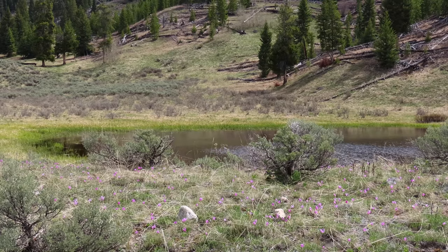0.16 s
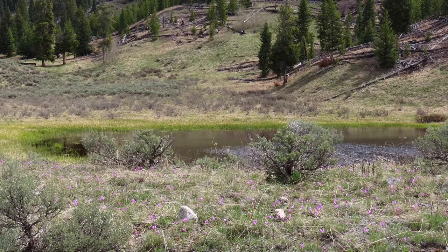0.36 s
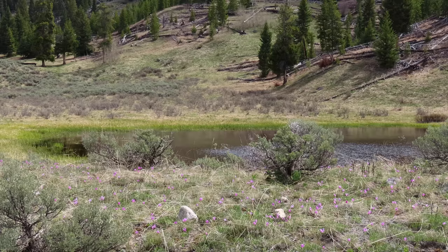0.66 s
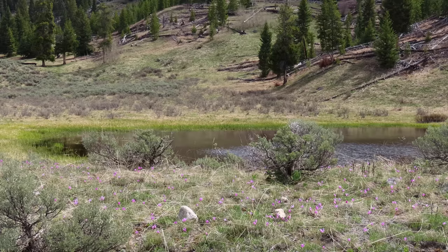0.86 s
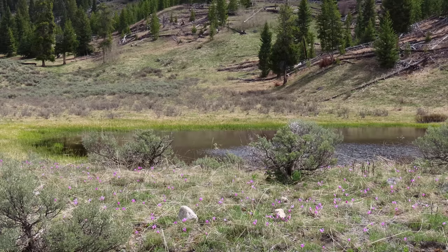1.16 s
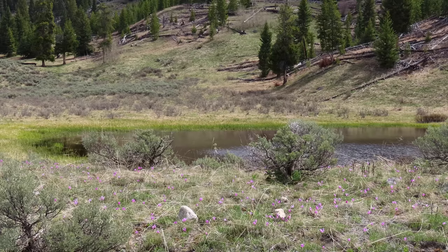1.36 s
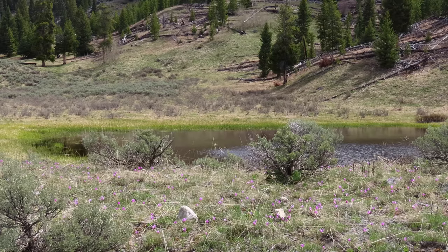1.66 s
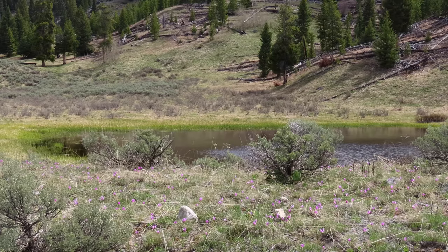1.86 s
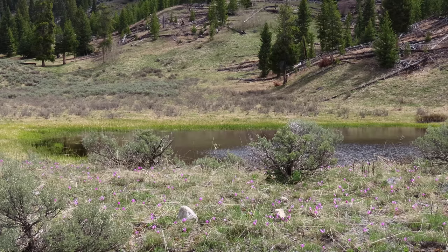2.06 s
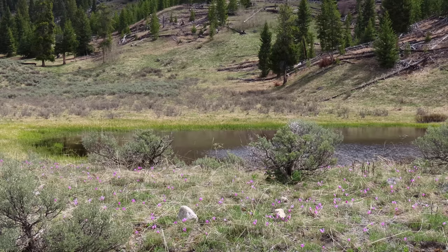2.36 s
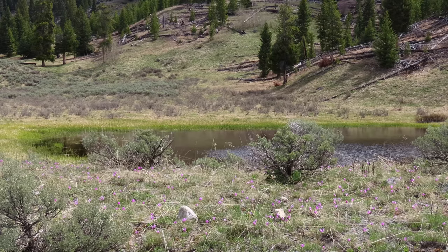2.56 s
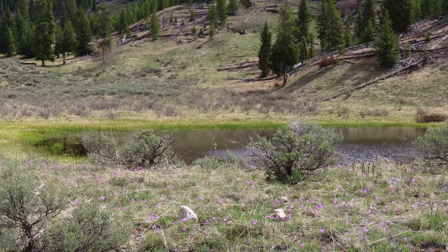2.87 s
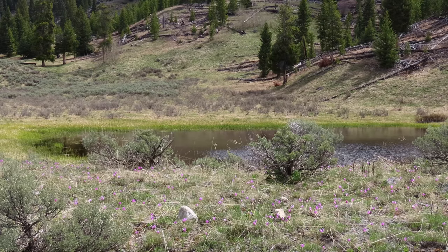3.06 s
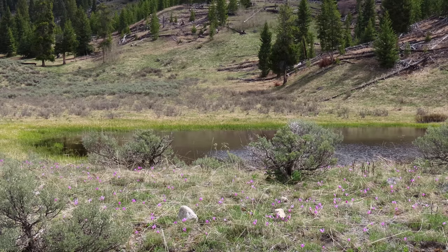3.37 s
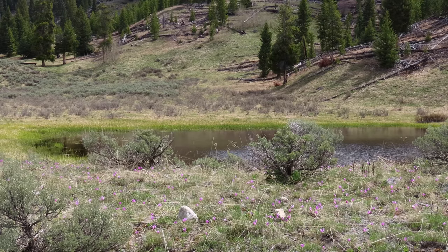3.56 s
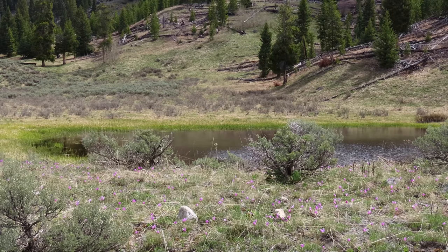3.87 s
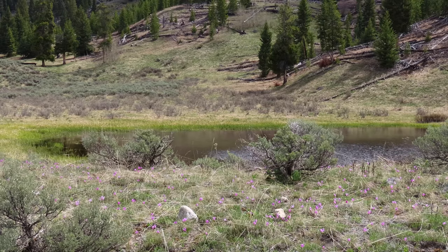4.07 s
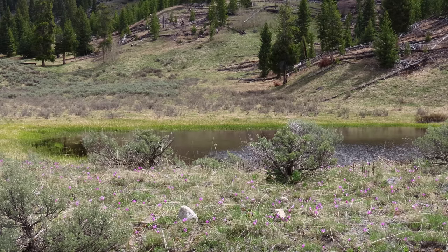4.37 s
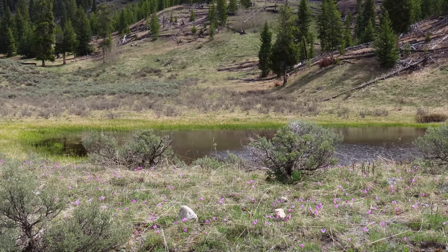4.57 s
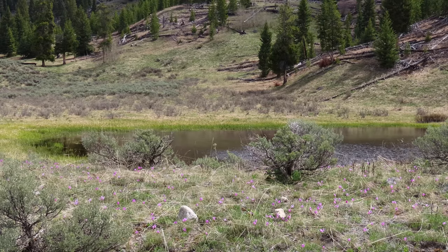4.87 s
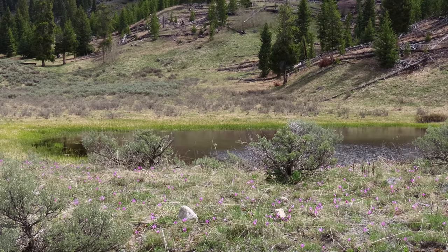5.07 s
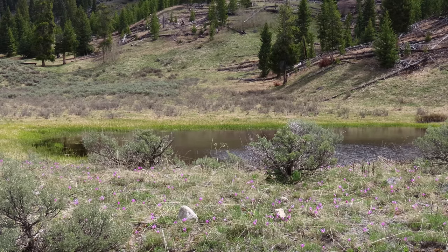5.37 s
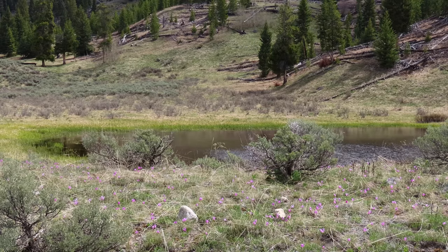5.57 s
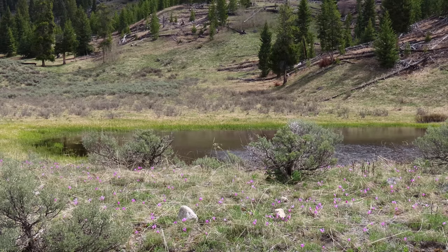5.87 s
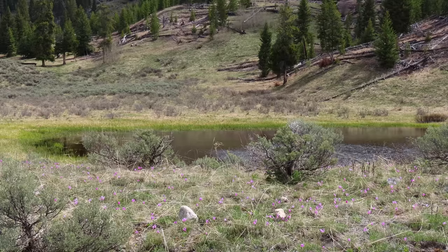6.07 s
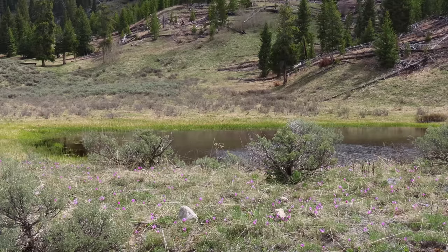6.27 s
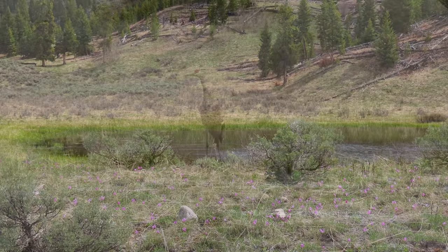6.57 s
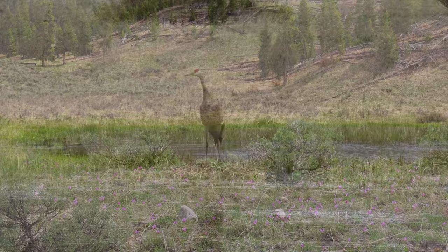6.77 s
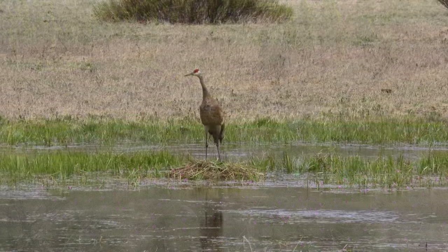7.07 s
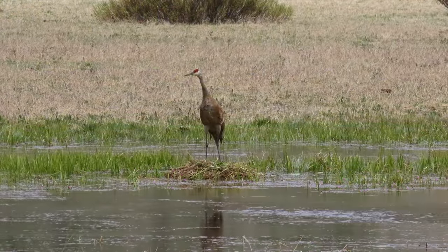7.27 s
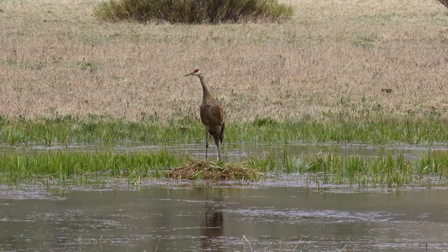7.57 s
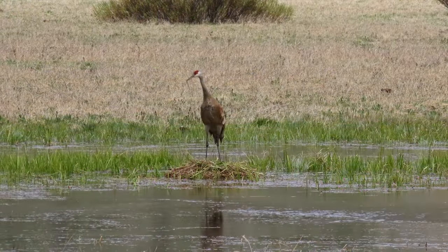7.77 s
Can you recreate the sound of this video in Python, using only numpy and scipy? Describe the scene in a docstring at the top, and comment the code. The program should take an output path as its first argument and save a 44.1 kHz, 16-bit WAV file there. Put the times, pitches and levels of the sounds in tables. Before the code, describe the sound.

Small frogs trill in overlapping rattling trains at a marshy pond, over low wind rumble, until the calls stop abruptly and only wind remains.

```python
"""Frog trills at a meadow pond

Small frogs trill in trains of short notes that mostly slow down and climb in pitch, each note a few sine partials.
Near frogs are heard note by note, far ones as a faint rattle; the frog sound is cut off abruptly at about 7.2 s.
Coloured noise makes wind on the microphone, a rush in the grass and camera hiss, with a thin sine whine.
A few dry ticks are bursts of noise, and two low puffs are short sines."""
import sys
import numpy as np
from scipy import signal
from scipy.fft import rfft, irfft, next_fast_len
from scipy.io import wavfile
from scipy.ndimage import uniform_filter1d, map_coordinates

SR = 44100
rng = np.random.default_rng(int(sys.argv[2]) if len(sys.argv) > 2 else 0)


def file_out(sig):
    """Save sig as 16-bit WAV at sys.argv[1]."""
    # one column per channel
    cols = np.atleast_2d(sig).T
    # limit, then scale
    lim = np.clip(cols, -1, 1)
    pcm = np.round(lim * 32767).astype(np.int16)
    wavfile.write(sys.argv[1], SR, pcm)


N = 349713  # length [samples]


def amp(db):
    """Gain of a level in dB."""
    return 10 ** (np.asarray(db) / 20)


def unit(x):
    """x scaled to rms 1."""
    return x / np.sqrt(np.mean(x ** 2) + 1e-20)


def curves(rows, s):
    """The columns after the time, read at times s."""
    times, *columns = np.transpose(rows)
    return [np.interp(s, times, column) for column in columns]


def wobble(rate):
    """A smooth random curve with rate knots a second."""
    knots = rng.standard_normal(int(N * rate / SR) + 4)
    return map_coordinates(knots, [np.arange(N) * rate / SR])


def colour(points):
    """Gain against frequency, drawn through (frequency [Hz], level [dB]) points on a log axis."""
    f, db = np.transpose(points)
    return lambda hz: amp(np.interp(np.log(hz + 1), np.log(f + 1), db))


def filtered(x, response):
    """x with its spectrum multiplied by a response of frequency."""
    m = next_fast_len(N + 8192)
    gain = response(np.fft.rfftfreq(m, 1 / SR))
    return irfft(rfft(x, m) * gain, m)[:N]


def rush(spectrum, patchy_db):
    """Noise of rms 1 with the given colour and patches of random gain in time and frequency."""
    z = signal.stft(rng.standard_normal(N), nperseg=512)[2]
    field = uniform_filter1d(rng.standard_normal(z.shape), size=6, axis=0)
    field = uniform_filter1d(field, size=12, axis=1)
    noise = signal.istft(z * amp(patchy_db * unit(field)), nperseg=512)[1][:N]
    return unit(filtered(noise, colour(spectrum)))


def placed(s, rows):
    """Sum of short sounds, one row each, starting at times s."""
    at = np.round(s * SR).astype(int)[:, None] + np.arange(rows.shape[1])
    return np.bincount(at.ravel(), rows.ravel(), N + SR)[:N]


def swell(t, peak_s):
    """Quick rise to 1 at peak_s, then a roughly exponential fall."""
    u = t / peak_s
    return (u * np.exp(1 - u)) ** 2


# gusts on the microphone: (time [s], slow push level [dB], faster flutter level [dB]), before the random lumps
GUSTS = [(0.0, -35, -43), (0.06, -32, -44.5), (1.26, -39, -47), (1.59, -33, -38.5), (2.07, -23, -36),
         (2.16, -41, -42.5), (2.67, -22.5, -34.5), (2.72, -20.5, -30.5), (3.13, -34, -42), (3.66, -25, -33),
         (3.95, -31.5, -36), (4.97, -25, -33), (5.14, -31.5, -32.5), (5.26, -23, -35), (5.67, -35.5, -42.5),
         (5.85, -26.5, -29.5), (6.05, -28.5, -39.5), (6.2, -24.5, -32.5), (6.52, -36.5, -49),
         (6.58, -23.5, -39.5), (6.78, -24.5, -33), (7.33, -27.5, -42), (7.4, -21.5, -35),
         (7.64, -36.5, -44), (7.93, -29, -44.5)]
# colours of the pushes and of the flutter: (frequency [Hz], relative level [dB])
PUSH_COLOUR = [(5, -20), (10, 7), (32, 7.5), (110, -7), (170, -47), (300, -120)]
FLUTTER_COLOUR = [(45, -34), (85, -0.5), (199, -7), (420, -27), (900, -120)]


def microphone_wind():
    """Eddies thump the microphone in lumps: a deep rumble and a faster flutter swell together."""
    lumps = wobble(14)
    rumble = unit(amp(2 * lumps) * rush(PUSH_COLOUR, patchy_db=0.3))
    flutter_gain = amp(1.25 * lumps + 0.92 * wobble(25))
    flutter = unit(flutter_gain * rush(FLUTTER_COLOUR, patchy_db=1.5))
    push_db, flutter_db = curves(GUSTS, np.arange(N) / SR)
    return amp(push_db) * rumble + amp(flutter_db) * flutter


# steady air, read by the grass and the hiss below: (time [s], grass level [dB], hiss level [dB]), before trims
AIR_LEVELS = [(0.0, -52.5, -64), (1.94, -52.5, -65), (6.69, -50.5, -63.5), (6.93, -47.5, -61.5),
              (7.93, -50, -64.5)]
# colour of the grass: (frequency [Hz], relative level [dB])
GRASS_COLOUR = [(150, -90), (250, -10.5), (920, -15.5), (1270, -20.5), (1710, -25), (2060, -28.5),
                (3500, -49), (4550, -77), (7700, -120)]


def grass_rush():
    """Wind in grass and trees: many small rustles blur into a rush more even than the gusts."""
    level_db = curves(AIR_LEVELS, np.arange(N) / SR)[0] + 3.5
    return amp(level_db) * rush(GRASS_COLOUR, patchy_db=0.78)


# colour of the camera hiss: (frequency [Hz], relative level [dB])
HISS_COLOUR = [(1470, -39), (2500, 0), (5940, -2), (15800, -5.5)]


def camera_hiss():
    """The camera's own noise: a bright, nearly steady hiss."""
    level_db = curves(AIR_LEVELS, np.arange(N) / SR)[1] + 5.0
    return amp(level_db) * rush(HISS_COLOUR, patchy_db=.3)


# thin whine: (frequency [Hz], level [dB] before a trim)
WHINE_TONES = [(9426, -86)]


def camera_whine():
    """A thin sine whose frequency drifts a little."""
    s = np.arange(N) / SR
    drift = 2 * np.pi * np.cumsum(18 * wobble(30)) / SR  # 18 Hz deviation per unit of wobble
    return sum(amp(db + 11.5) * np.sin(2 * np.pi * hz * s + drift) for hz, db in WHINE_TONES)


# partials of a note: (level [dB], tilt [dB per octave of pitch], time to peak [s] before random stretch)
NOTE_PARTIALS = [(-18, -3.5, 0.0016), (0, -2.5, 0.0026), (-24.5, 16, 0.0015), (-37.5, 17, 0.0028),
                 (-50.5, -11, 0.0029)]
# harmonic number of each partial, in multiples of half the pitch
HARMONICS = (1, 2, 3, 4, 6)
# colour of each note's noisy onset: (frequency [Hz], level [dB])
SNAP_COLOUR = [(800, -48), (1800, 21.5), (5600, 12), (6100, -13), (11000, -40)]


def notes(s, db, hz):
    """A puff through the vocal folds: harmonics of half the pitch; the throat sac favours the second."""
    t = np.arange(1024) / SR
    luck = rng.standard_normal((len(s), 3 + 2 * len(NOTE_PARTIALS)))
    wander = .012 * luck[:, :1]
    drop = 0.018 * np.tanh((hz[:, None] - 2250) / 60)  # the lowest notes tend to slide up instead
    sag = 1 + (drop + wander) * np.tanh((.003 - t) / 0.0033)  # pitch drops as the puff weakens
    phase = np.pi * np.cumsum(hz[:, None] * sag, axis=1) / SR  # half the pitch
    stretch = np.exp(0.028 * luck[:, 1:2])
    octaves = np.log2(hz[:, None] / 2600)
    tone = 0
    for k, (level_db, tilt_db, peak_s) in enumerate(NOTE_PARTIALS):
        scatter_db = 0.11 * level_db * luck[:, 3 + k:4 + k]  # weak partials vary most
        gain = amp(level_db + tilt_db * octaves + scatter_db)
        start_phase = 3 * luck[:, -1 - k, None]
        wave = np.sin(HARMONICS[k] * phase + start_phase)
        tone = tone + gain * swell(t, peak_s * stretch) * wave
    # the folds burst open
    snap = amp(-41 + 1.1 * luck[:, 2:3]) * swell(t, 0.003) * rng.standard_normal(tone.shape)
    level = amp(db)[:, None]
    return placed(s, level * tone) + filtered(placed(s, level * snap), colour(SNAP_COLOUR))


def through(values, count):
    """count values on the smooth arc through evenly spaced values."""
    arc = np.polyfit(np.linspace(0, 1, len(values)), values, len(values) - 1)
    return np.polyval(arc, np.linspace(0, 1, count))


def trill(row):
    """The notes of one trill: timing, level and pitch each follow a smooth arc."""
    count = round(row[5])
    scatter_db = 0.15 * rng.standard_normal(count)
    db = through(row[6:10], count) + scatter_db
    return np.array([through(row[:5], count), db, through(row[10:], count)])


# far frogs: (time [s], typical note level [dB], mean pitch [Hz])
FAR_CHORUS = [(0, -38, 2454), (.9, -40.5, 2650), (1, -38.5, 2350), (1.3, -32.5, 2465), (2, -35.5, 2680),
              (2.2, -43, 2595), (3.8, -38, 2614), (4, -39, 2460), (4.7, -33, 2730), (5.2, -36, 2530),
              (6.2, -46, 2705), (6.4, -37, 2384), (7.18, -36.5, 2756), (7.21, -76, 2780)]


def far_frogs():
    """Many distant callers overlap: faint notes at jittered moments merge into a rattle."""
    luck = rng.standard_normal((520, 3))
    s = np.linspace(0, N / SR, len(luck)) + .009 * np.abs(luck[:, 0])
    db, hz = curves(FAR_CHORUS, s)
    return notes(s, db + 2.5 * luck[:, 1], hz * np.exp(.045 * luck[:, 2]))


# near trills: (start, quarter, half, three quarters and end time [s], number of notes,
# level at start, a third, two thirds and end [dB], strongest partial at start, middle and end [Hz])
NEAR_TRILLS = [(0.0057, 0.1439, 0.3016, 0.4802, 0.6664, 11, -24.6, -19.3, -24.2, -19.8, 2520.0, 2640.0, 2780.0),
               (0.0355, 0.1793, 0.3471, 0.5387, 0.736, 11, -26.9, -21.3, -18.5, -21.9, 2640.0, 2750.0, 2870.0),
               (0.0377, 0.217, 0.4146, 0.644, 0.8951, 16, -27.4, -20.4, -16.1, -20.6, 2170.0, 2340.0, 2550.0),
               (0.4707, 0.5607, 0.6534, 0.7481, 0.8429, 5, -26.5, -21.8, -21.1, -21.4, 2450.0, 2490.0, 2510.0),
               (0.9853, 1.2095, 1.4774, 1.8019, 2.1623, 19, -33.7, -23.4, -19.6, -19.9, 2360.0, 2630.0, 2770.0),
               (1.1307, 1.324, 1.5412, 1.7851, 2.0425, 17, -28.4, -24.4, -17.4, -24.4, 2390.0, 2540.0, 2700.0),
               (1.4423, 1.5005, 1.5603, 1.6238, 1.6932, 5, -22.8, -17.2, -16.8, -21.6, 2430.0, 2610.0, 2600.0),
               (2.1313, 2.2934, 2.4719, 2.6758, 2.8999, 13, -27.3, -25.0, -21.3, -18.5, 2420.0, 2580.0, 2750.0),
               (2.2633, 2.4323, 2.6234, 2.8413, 3.0753, 16, -30.2, -26.2, -24.8, -27.4, 2420.0, 2580.0, 2720.0),
               (2.8005, 3.0028, 3.2268, 3.4956, 3.804, 19, -29.9, -22.7, -17.3, -24.0, 2150.0, 2320.0, 2520.0),
               (3.1435, 3.3067, 3.4851, 3.6973, 3.9239, 13, -29.0, -26.9, -20.0, -24.5, 2490.0, 2560.0, 2770.0),
               (3.8991, 4.0384, 4.2002, 4.3874, 4.5826, 11, -27.6, -20.2, -22.0, -19.4, 2610.0, 2810.0, 2830.0),
               (3.9399, 4.0894, 4.2654, 4.4703, 4.6876, 14, -31.8, -24.1, -18.5, -21.4, 2380.0, 2510.0, 2670.0),
               (4.1205, 4.294, 4.4798, 4.6883, 4.9065, 14, -25.8, -23.8, -19.1, -15.4, 2440.0, 2600.0, 2750.0),
               (4.135, 4.3356, 4.5658, 4.8304, 5.1179, 13, -28.8, -23.9, -22.1, -19.1, 2300.0, 2420.0, 2610.0),
               (4.4125, 4.4924, 4.5733, 4.6611, 4.7521, 6, -23.4, -21.6, -19.5, -18.2, 2580.0, 2710.0, 2780.0),
               (4.8553, 4.9329, 5.012, 5.0886, 5.158, 5, -20.9, -18.5, -17.1, -21.9, 2720.0, 2770.0, 2750.0),
               (4.8842, 5.0437, 5.2286, 5.4369, 5.6505, 12, -27.0, -18.9, -14.1, -15.8, 2510.0, 2720.0, 2810.0),
               (5.0954, 5.2876, 5.5011, 5.7491, 6.0277, 18, -30.6, -22.4, -20.3, -14.1, 2170.0, 2300.0, 2560.0),
               (5.3809, 5.4909, 5.614, 5.7454, 5.8786, 8, -23.0, -21.1, -18.7, -22.3, 2520.0, 2660.0, 2720.0),
               (5.7084, 5.7386, 5.769, 5.7997, 5.8306, 3, -22.1, -23.1, -24.2, -25.2, 2730.0, 2740.0, 2760.0),
               (5.932, 6.0172, 6.1046, 6.1937, 6.2824, 6, -29.3, -35.0, -33.2, -34.1, 2730.0, 2720.0, 2760.0),
               (6.1087, 6.1426, 6.1767, 6.2109, 6.2452, 3, -32.6, -32.1, -31.6, -31.2, 2690.0, 2710.0, 2720.0),
               (6.2528, 6.3477, 6.4537, 6.5722, 6.7032, 9, -31.0, -21.2, -19.4, -22.0, 2450.0, 2500.0, 2620.0),
               (6.2887, 6.4659, 6.6654, 6.9029, 7.1792, 17, -30.4, -24.7, -23.9, -21.3, 2290.0, 2510.0, 2790.0),
               (6.7, 6.814, 6.9381, 7.0682, 7.2013, 9, -25.4, -21.9, -22.6, -21.5, 2530.0, 2650.0, 2740.0),
               (6.7125, 6.8129, 6.9247, 7.0493, 7.1901, 9, -23.0, -15.5, -17.9, -18.7, 2550.0, 2700.0, 2790.0)]
# single notes: stray calls, and some first or last notes of the trills above: (time [s], level [dB], pitch [Hz])
SINGLE_NOTES = [(0.262, -30, 2720), (1.1107, -33, 2370), (1.1468, -34, 2500), (1.392, -27, 2560),
                (1.81, -33, 2800), (2.032, -33, 2380), (2.081, -31, 2400), (2.765, -39, 2117),
                (2.803, -32, 2700), (2.861, -34, 2770), (3.438, -34, 2646), (5.061, -38, 2130),
                (0.487, -27.5, 2820), (0.7166, -23, 2725), (0.778, -25.5, 2920), (0.953, -31, 2780),
                (1.017, -33, 2730), (1.465, -25.8, 2590), (1.527, -22, 2600), (3.966, -29, 2750),
                (4.166, -27, 2540), (4.4666, -26, 2590), (5.1668, -20, 2610), (5.2945, -30, 2710),
                (5.461, -31.3, 2834), (6.083, -17, 2544), (6.5425, -31, 2500), (7.079, -23.5, 2700),
                (7.0976, -25, 2700), (7.1632, -26, 2780)]


def near_frogs():
    """Close callers: trains of separate puffs, plus the single notes."""
    trains = [trill(row) for row in NEAR_TRILLS]
    return notes(*np.hstack(trains + [np.transpose(SINGLE_NOTES)]))


def scattered(x):
    """A short diffuse echo; a fresh random tail every fifth of a second keeps it from humming."""
    t, step = np.arange(SR // 10) / SR, SR // 5
    parts = np.pad(x, (0, -N % step)).reshape(-1, step)
    decay = amp(-60 * t / .07) * (t > .002)  # 60 dB down in 0.07 s
    tails = rng.standard_normal((len(parts), len(t))) * decay
    tails = tails / np.linalg.norm(tails, axis=1, keepdims=True)
    return placed(np.arange(len(parts)) * step / SR, signal.fftconvolve(parts, tails, axes=1))


def frogs():
    """Direct calls plus their diffuse echo; far notes arrive more scattered than near ones."""
    far, near = far_frogs(), near_frogs()
    sent = amp(-15) * near + amp(-4) * far
    return near + far + scattered(sent)


# faint dry ticks: (time [s], level [dB] before a trim and colouring)
DRY_TICKS = [(2.7679, -59), (4.6174, -56.5), (6.613, -53)]


def ticks():
    """Dry ticks: noise bursts of a few milliseconds, strongest around 4 kHz."""
    t = np.arange(2048) / SR
    s, db = np.transpose(DRY_TICKS)
    crack = rng.standard_normal((len(s), len(t))) * swell(t, 0.0018)
    tick_colour = colour([(1500, -34), (4000, 12), (9000, 3), (13000, -20)])
    return filtered(placed(s, amp(db + 6)[:, None] * crack), tick_colour)


# short low puffs: (time [s], level [dB], frequency [Hz])
LOW_PUFFS = [(7.225, -25, 236), (7.483, -29.5, 256)]


def low_puffs():
    """Low puffs: a sine that swells and dies within a few hundredths of a second."""
    t = np.arange(2048) / SR
    s, db, hz = np.transpose(LOW_PUFFS)
    wave = np.sin(2 * np.pi * hz[:, None] * t)
    return placed(s, amp(db)[:, None] * swell(t, 0.005) * wave)


def scene():
    """Everything summed at one microphone."""
    air = microphone_wind() + grass_rush()
    camera = camera_hiss() + camera_whine()
    return (air + camera + frogs() + ticks() + low_puffs())[None]


def record(dry):
    """The camera keeps nothing above its band limit."""
    top_hz = 15760
    return filtered(dry[0], lambda hz: hz < top_hz)[None]


dry = scene()
out = record(dry)
file_out(out)
```